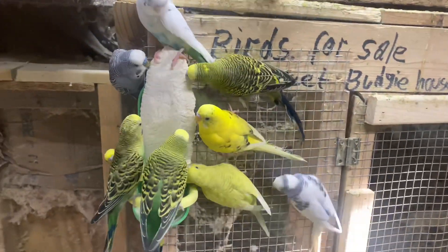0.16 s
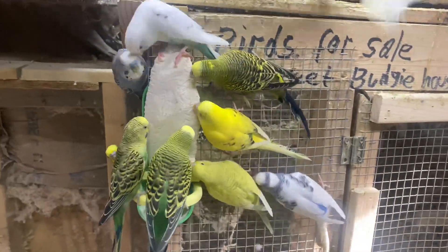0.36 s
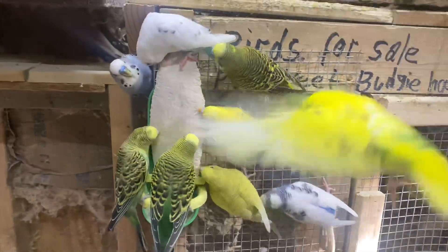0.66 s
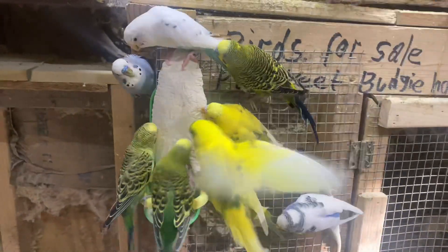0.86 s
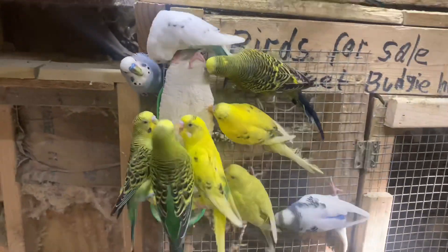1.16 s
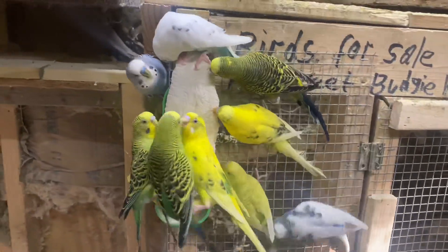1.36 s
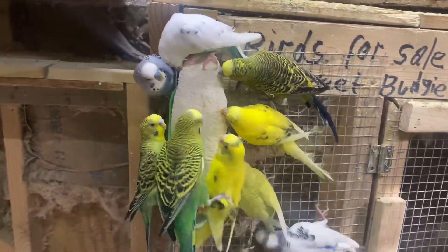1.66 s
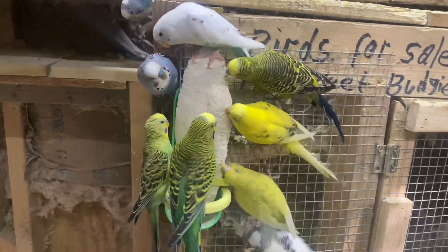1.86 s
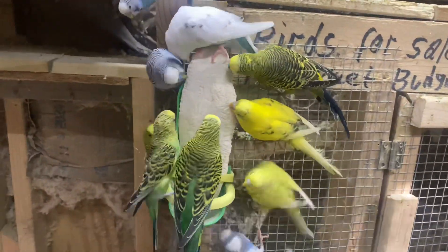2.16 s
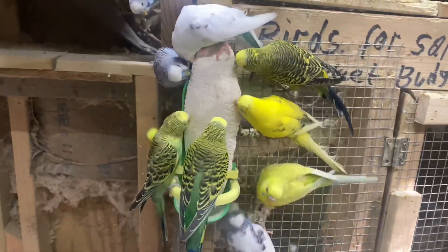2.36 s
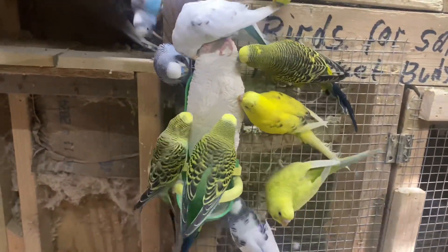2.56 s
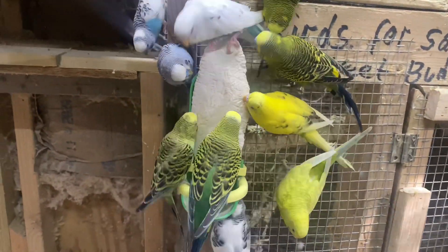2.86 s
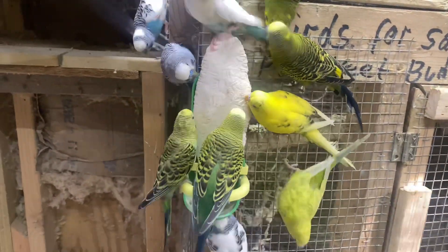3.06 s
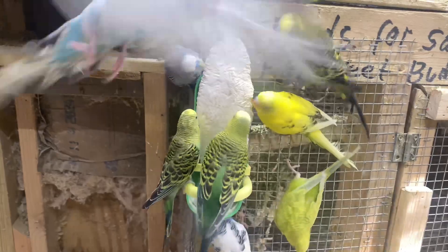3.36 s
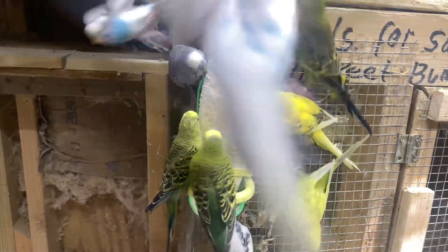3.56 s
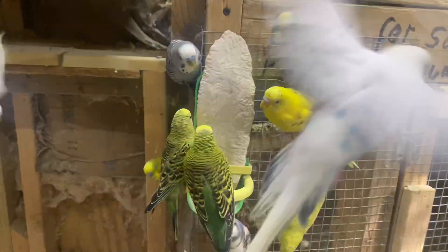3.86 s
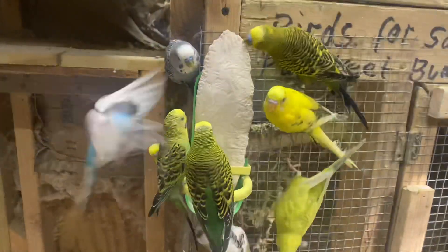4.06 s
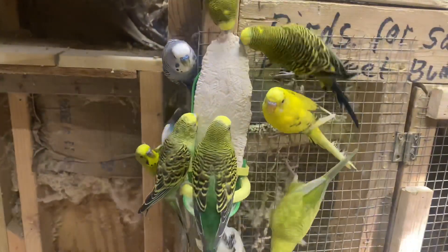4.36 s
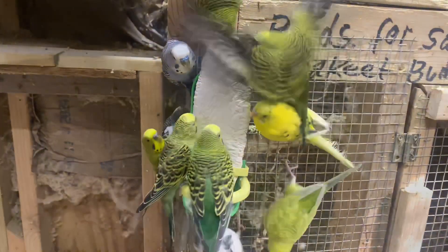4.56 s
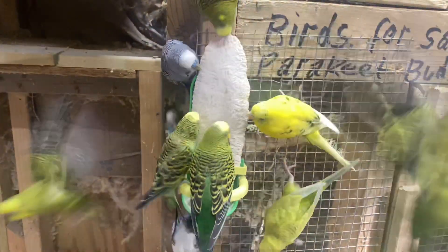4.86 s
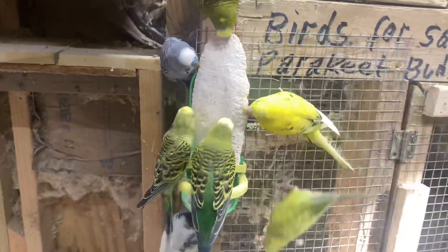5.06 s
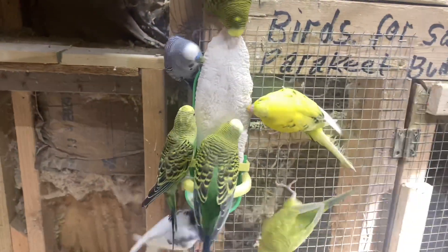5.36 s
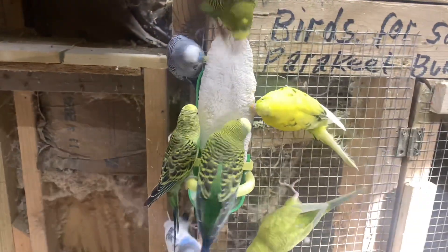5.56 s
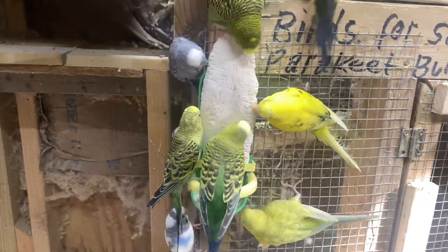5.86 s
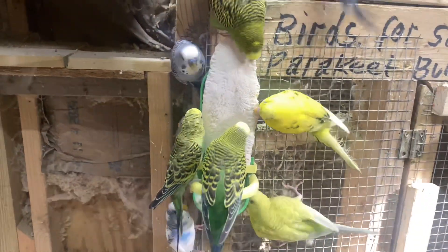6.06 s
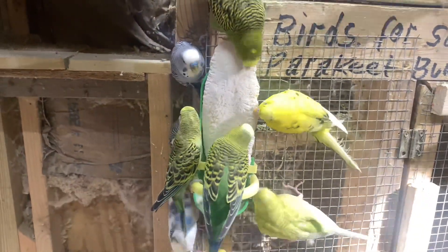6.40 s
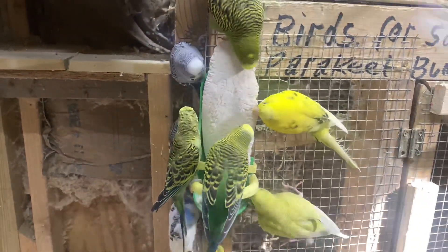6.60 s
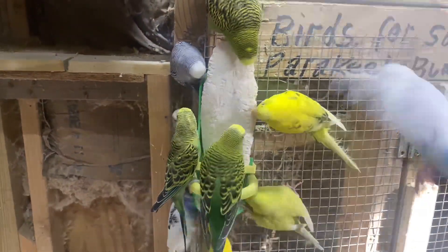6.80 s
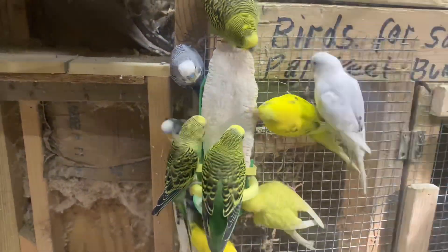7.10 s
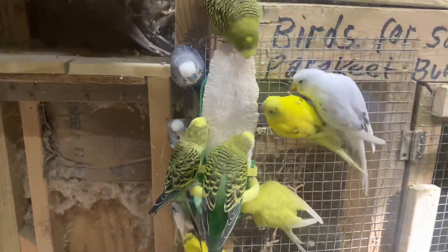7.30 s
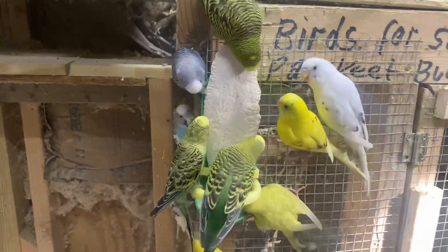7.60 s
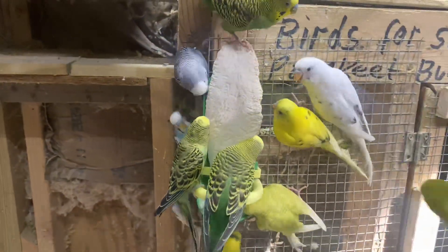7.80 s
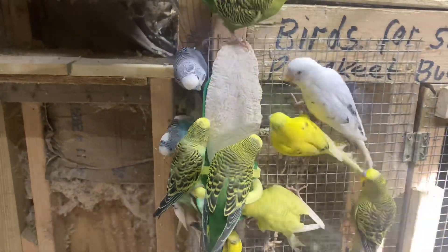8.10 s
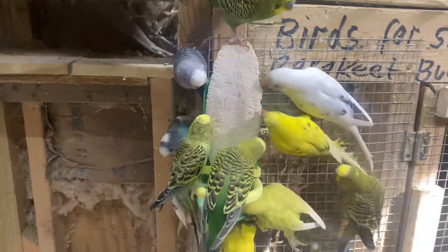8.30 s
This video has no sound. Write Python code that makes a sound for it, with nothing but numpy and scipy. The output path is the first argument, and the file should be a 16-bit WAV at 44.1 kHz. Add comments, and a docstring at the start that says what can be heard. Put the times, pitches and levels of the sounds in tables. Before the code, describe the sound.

Budgerigars chatter throughout in a small wooden aviary with a short echo, over a faint rustle and low rumble. Close birds give buzzy, falling chirps roughly once a second, pausing around the middle. A board knocks dully at the very start. Harsh scolding rasps run through the first 1.8 seconds, and wings swish and whistle from 0.6 to 2 seconds. Bright, quick whistled notes cluster near 3 seconds, followed by more rasps. From 3.4 to 5 seconds, birds fly close, their wingbeats pushing low, soft thumps of air at the microphone, with whistling feathers until 5.2. Another scolding run comes at 6.3, then more air puffs at 6.6 and a brisk flutter from 7 to 7.5. Short whistles, rasps and lighter flapping continue to the end, at about 8.5 seconds. Claws and beaks occasionally tick on wire mesh, clearest at 0.8 and 4.4 seconds.

```python
"""Budgerigars in a small wooden aviary

Close by, the birds chirp, whistle and rasp with the syrinx, a bird's voice box. Some fly past:
their wing feathers whistle and push puffs of air at the microphone. Claws and beaks tick on
the wire mesh, and a board knocks once. Behind it all the rest of the flock chatters,
over a faint rustle and a low rumble."""
import sys
import numpy as np
from scipy import signal
from scipy.fft import rfft, irfft, next_fast_len
from scipy.io import wavfile

SR = 44100
rng = np.random.default_rng(int(sys.argv[2]) if len(sys.argv) > 2 else 0)


def materialize(psi):
    """Save the field psi as 16-bit PCM at rate SR to the path in sys.argv[1].

    A 1-D psi becomes a single channel; in a 2-D psi each row is a channel.
    """
    bounded = np.clip(np.atleast_2d(psi).T, -1, 1)
    quanta = np.round(bounded * 32767).astype(np.int16)
    wavfile.write(sys.argv[1], SR, quanta)


N = 372204

# Each row: start in seconds, length in seconds, level in dB, roughness (0 is clean),
# boost of the chirp's first step in dB.
CHIRP_CALLS = [(0.083, 0.16, -22.5, .5, 1), (0.7, 0.16, -22, .35, 6), (1.434, 0.155, -24, .55, 0),
               (2.236, 0.158, -22.5, .75, 2), (4.505, 0.16, -25, 1, -1), (5.193, 0.157, -23, 1.15, 0),
               (6.014, 0.162, -20.5, .65, -7), (6.807, 0.162, -22, .85, 0), (7.605, 0.16, -24, 1, -1)]
# How one chirp unfolds. Each row: share of its length, pitch in Hz, level change in dB,
# warble depth in Hz at roughness 1.
CHIRP_STEPS = [(0, 3780, -4, 120), (.08, 3670, 2, 100), (.13, 3660, 0, 200), (.16, 3620, -9, 500),
               (.22, 3420, -1, 350), (.32, 3180, 3, 250), (.44, 3120, 1, 300), (.485, 3650, -5, 700),
               (.55, 2600, -7, 400), (.64, 2990, -1, 300), (.77, 2940, 2, 130), (.9, 2990, 2, 160),
               (1, 3020, -4, 300)]


def chirps(pulse_hz=95, pulse_depth=.8):
    """The flock's shared call: three falling steps that break into quick, uneven pulses."""
    out = np.zeros((2, N))
    share, *curves = np.transpose(CHIRP_STEPS)
    for start, length, db, rough, boost_db in CHIRP_CALLS:
        t = clock(length)
        pitch, level_db, warble = [np.interp(t / t[-1], share, curve) for curve in curves]
        call = syrinx(t, pitch, warble * rough, flutter_hz=380, jitter_hz=140 * rough,
                      shimmer_db=2.5, overtone_db=-18.5)
        first_step = np.exp(-(t / length * 6) ** 4)   # 1 at first, then 0
        pulses = np.cumsum(pulse_hz * np.exp(.5 * wander(t, 110))) / SR
        throb = 1 - pulse_depth * (1 - first_step) * np.cos(np.pi * pulses) ** 4
        call = unit_level(call * from_db(level_db + boost_db * first_step) * throb * fade(t, .01, .016))
        add(out, start, placed(call * from_db(db), pan_db=1.6, echo_db=-13, spread_s=.0001))
    return out


# Each row: start in seconds, length in seconds, first and last pitch in Hz, level in dB, roughness.
WHISTLED_NOTES = [(0.453, 0.07, 2290, 2740, -28.5, 0.41), (1.8, 0.074, 1524, 2215, -39, 0.22),
                  (2.555, 0.11, 2410, 3005, -27.5, 0.82), (2.784, 0.041, 3210, 3350, -26.5, 0.79),
                  (2.841, 0.021, 2895, 2824, -16, 0.08), (2.874, 0.036, 3810, 3770, -20, 0.13),
                  (3.018, 0.022, 3010, 2910, -19, 0.053), (3.05, 0.032, 2947, 3057, -18.5, 0.29),
                  (3.214, 0.036, 3280, 3170, -34, 0.42), (3.635, 0.052, 3250, 3480, -39.5, 0.49),
                  (3.669, 0.11, 3750, 3780, -25.5, 0.77), (3.827, 0.11, 3650, 3270, -30, 1.3),
                  (4.544, 0.015, 3250, 3150, -17.5, 0.08), (4.771, 0.081, 3435, 3680, -25, 0.63),
                  (4.868, 0.096, 3334, 3570, -30.5, 0.45), (4.941, 0.043, 6660, 6580, -36.5, 0.36),
                  (4.98, 0.073, 3130, 3350, -27.5, 0.94), (5.247, 0.01, 3140, 3050, -17.5, 0.14),
                  (5.288, 0.061, 3940, 3650, -22.5, 0.36), (5.478, 0.051, 6540, 6500, -35.5, 0.37),
                  (5.5, 0.074, 2246, 2730, -28.5, 0.61), (6.058, 0.043, 3370, 3100, -24.5, 0.08),
                  (6.54, 0.0603, 3634, 3350, -25.5, 0.58), (6.993, 0.053, 2720, 2880, -28, 0.39),
                  (7.568, 0.049, 4400, 3890, -21, 1.73), (7.868, 0.027, 3390, 2570, -26, 1.1),
                  (7.91, 0.078, 2386, 2695, -26.5, 0.85), (8.031, 0.088, 2797, 3154, -25.5, 1.26),
                  (8.382, 0.08, 2610, 2520, -30, 0.94)]


def whistles():
    """Short notes glide from one pitch to another; the rough ones buzz and start more gently."""
    out = np.zeros((2, N))
    for start, length, first_hz, last_hz, db, rough in WHISTLED_NOTES:
        t = clock(length)
        pitch = np.linspace(first_hz, last_hz, len(t))
        call = syrinx(t, pitch, warble_hz=300 * rough, flutter_hz=330, jitter_hz=160 * rough,
                      shimmer_db=3.5 * rough, overtone_db=-24)
        call *= fade(t, in_s=.00092 + .0019 * rough, out_s=.0029)
        add(out, start, placed(call * from_db(db), pan_db=1.2, echo_db=-17, spread_s=.0001))
    return out


def syrinx(t, pitch_hz, warble_hz, flutter_hz, jitter_hz, shimmer_db, overtone_db):
    """A bird's voice: a nearly pure tone that buzzes as its pitch shakes hundreds of times a second."""
    flutter = np.sin(phase_of(flutter_hz * np.exp(.263 * wander(t, 69.2))))
    phase = phase_of(pitch_hz + warble_hz * flutter + jitter_hz * wander(t, 506.4))
    overtones = np.sin(2 * phase) + .22 * np.sin(3 * phase) * (pitch_hz < SR / 6)
    tone = np.sin(phase) + from_db(overtone_db) * overtones
    return unit_level(tone * from_db(shimmer_db * wander(t, 113.8)))


# Runs of scolding. Each row: start in seconds, number of rasps, base length of each in seconds,
# strength of the shrill part in dB, strength of the throaty part in dB.
SCOLDING_RUNS = [(0, 1, 0.067, -30, -33.5), (.172, 1, 0.1, -31.5, -35), (0.424, 1, 0.13, -33, -27.5),
                 (.59, 1, .1, -32.5, -31), (0.81, 1, 0.16, -31, -28.5), (0.95, 5, 0.13, -31.5, -26),
                 (2.445, 1, 0.072, -38.5, -34), (2.924, 1, 0.044, -26, -20.5),
                 (3.102, 1, 0.047, -27.5, -35), (3.32, 4, 0.069, -28.5, -26), (4.08, 1, 0.13, -28, -30.5),
                 (4.295, 1, 0.057, -29, -30), (5.841, 1, 0.12, -36.5, -31), (6.071, 1, 0.02, -36, -26),
                 (6.197, 1, 0.095, -45, -27.5), (6.33, 3, 0.071, -28.5, -25), (7.24, 1, 0.036, -50, -22),
                 (7.567, 1, 0.017, -31, -22.5), (7.718, 1, 0.035, -35.5, -20),
                 (7.788, 1, 0.043, -37.5, -46), (7.955, 1, 0.034, -35.5, -25), (8.238, 1, 0.027, -43, -32)]
# The tone of those two parts. Each row: frequency in Hz, boost in dB.
SHRILL_TONE = [(3000, -27), (4400, -8.5), (5400, 1), (6400, -3), (7300, -1.5), (8300, -8), (9400, -19.5),
               (10900, -4.5), (12200, -15), (13200, -18.5), (15500, -21)]
THROATY_TONE = [(900, -63), (1350, -28.5), (1700, -7), (2200, -11.5), (2700, -4), (3400, 0.5), (4200, 0.5),
                (5200, -2), (7000, -55)]


def rasps(rattle_hz=230, screech_hz=3250, throat_hz=3300, rise=.07):
    """The syrinx snaps unevenly: a shrill screech rises, swells and fades over a throaty rattle."""
    out = np.zeros((2, N))
    for start, length, shrill_db, throaty_db in each_rasp(SCOLDING_RUNS):
        t = clock(length + .0358)
        cycles = np.cumsum(rattle_hz * np.exp(.3 * wander(t, 200))) / SR
        snaps = np.diff(np.floor(cycles), prepend=0) * from_db(2 * wander(t, 322))   # one per cycle
        rattle = from_db(6 * np.cos(2 * np.pi * cycles) + 2.5 * wander(t, 90))
        tuning = np.exp(.035 * rng.standard_normal())   # no two voices are quite alike
        progress = 2 * t / t[-1] - 1   # runs from -1 to 1
        swell = unit_level(from_db(-6 * progress ** 2))
        voice = screech(t, cycles, screech_hz * tuning * (1 + rise * progress / 2))
        shrill = coloured(hiss(t) * rattle, SHRILL_TONE) + unit_level(voice * rattle) * from_db(1)
        shrill *= swell * from_db(shrill_db - 1) * fade(t, .01, .045)
        throaty = coloured(hiss(t) * rattle, THROATY_TONE) * from_db(-4)
        throaty += ring(snaps, throat_hz / tuning, decay_s=.0016) * from_db(-9)
        throaty *= from_db(throaty_db) * fade(t, .0087, .018)
        add(out, start - .008, placed(shrill + throaty, pan_db=.2, echo_db=-12))
    return out


def each_rasp(runs, every_s=.179, drop_db=1.56):
    """A scolding bird keeps an even pace but tires, so each rasp is softer than the last."""
    for start, count, length, shrill_db, throaty_db in runs:
        for k in range(round(count)):
            yield start + k * every_s, length, shrill_db - k * drop_db, throaty_db - k * drop_db


# The strength in dB of the tones at one, two and three times the screech's pitch.
HARMONICS_DB = [-7, 5, -10.5]


def screech(t, cycles, pitch_hz, swing=.03, jitter=.02):
    """A forced voice: the pitch lurches with each snap, and the tone an octave up is loudest."""
    shake = swing * np.sin(2 * np.pi * cycles) + jitter * (wander(t, 1500) + wander(t, 70))
    phase = phase_of(pitch_hz * (1 + shake))
    return sum(from_db(db) * np.sin((k + 1) * phase) for k, db in enumerate(HARMONICS_DB))


# Each row: first and last wingbeat in seconds, number of beats, top pitch in Hz,
# then the strengths in dB of the low tone, its overtones and the swish.
WHISTLING_PASSES = [(0.635, 0.795, 4, 1800, -40, -39, -35), (0.962, 1.347, 7, 1900, -38, -38, -37),
                    (1.408, 1.67, 6, 1900, -39, -40, -38), (1.725, 1.779, 2, 2100, -37, -34, -37),
                    (1.913, 1.913, 1, 2400, -38, -31, -34), (3.19, 3.252, 2, 2500, -44, -32, -39),
                    (3.458, 3.458, 1, 2800, -38, -27, -33), (4.022, 4.022, 1, 2500, -37, -28, -34),
                    (4.293, 4.475, 4, 2600, -33, -26, -33), (4.54, 4.668, 3, 2500, -33, -29, -35),
                    (4.744, 4.967, 4, 2400, -33, -29, -37), (5.045, 5.197, 3, 2400, -32, -28, -37),
                    (5.705, 5.755, 2, 2900, -44, -35, -40), (7.033, 7.458, 8, 2450, -34, -23.5, -35),
                    (7.97, 8.21, 5, 2200, -35, -33, -37)]
# Air rushing through feathers. Each row: frequency in Hz, boost in dB.
SWISH_TONE = [(800, 1), (1700, -38), (3000, -26), (4800, 19), (6000, 14), (11000, 3), (15000, -8)]


def wing_whistles(start_hz=980, stroke_s=.021, skew_s=.0026):
    """Feathers flutter as each wing speeds up: a ragged whistle rises and levels off inside a swish."""
    out, t = np.zeros((2, N)), clock(.028)
    for start, top_hz, low_db, overtone_db, swish_db in each_beat(WHISTLING_PASSES, pitch_columns=1):
        for wing in range(2):
            late, slow, sharp, hard = rng.standard_normal(4)   # the two wings never quite match
            stroke = np.clip(t / stroke_s / np.exp(slow / 7), 0, 1)
            speed = np.sin(1.8 * stroke)
            pitch = (start_hz + (top_hz - start_hz) * speed) * np.exp(.06 * sharp + .055 * wander(t, 650))
            phase = phase_of(pitch)
            flutter = from_db(4.5 * wander(t, 600))
            force = np.sqrt(abs(np.sin(np.pi * stroke))) * flutter
            low = unit_level(np.sin(phase) * force * start_hz / pitch) * from_db(low_db)
            overtones = np.sin(2 * phase) + .27 * np.sin(3 * phase)
            high = unit_level(overtones * force * speed) * from_db(overtone_db)
            swish = coloured(hiss(t) * flutter, SWISH_TONE) * fade(t, .01, .02) * from_db(swish_db)
            beat = (low + high + swish) * from_db(1.6 * hard - 2 - 5 * wing)
            add(out, start - .007 + skew_s * late, placed(beat, pan_db=.2, echo_db=-14))
    return out


# Each row: first and last wingbeat in seconds, number of beats, strength in dB.
FANNING_PASSES = [(0.528, 0.805, 6, -20), (3.394, 3.505, 3, -12.5), (3.553, 4.01, 9, -13.5),
                  (4.145, 4.311, 4, -18.5), (4.578, 4.578, 1, -18), (4.813, 4.96, 4, -14.5),
                  (5.422, 5.484, 2, -19.5), (6.57, 6.885, 7, -15), (7.635, 7.8, 4, -21.5)]
# Rustle and rumble, in the puffs and in the background. Each row: frequency in Hz, boost in dB.
RUSTLE_TONE = [(100, -39), (180, 9), (300, 2.5), (400, 5), (490, 8), (650, -10), (900, -2), (1400, -4),
               (3000, -24)]
RUMBLE_TONE = [(20, -17), (35, -15), (55, -3.5), (75, -3), (110, -13.5), (170, -17.5), (300, -34)]


def wing_puffs(push_hz=58, swell_s=.012, flick_hz=800):
    """Each downstroke starts with a papery flick, then pulls and pushes the air in a low thump."""
    out, t = np.zeros((2, N)), clock(.55)
    swell = (t / swell_s) ** 2 * np.exp(2 - 2 * t / swell_s)
    for start, db in each_beat(FANNING_PASSES):
        pitch = push_hz * np.exp(rng.standard_normal() / 10)
        push = -np.sin(2 * np.pi * pitch * (t - .008)) * swell
        swirls = np.array([coloured(hiss(t), RUMBLE_TONE) for side in out])
        swirls *= np.sqrt(swell) * from_db(-6.5)
        rustle = coloured(hiss(t), RUSTLE_TONE) * np.sqrt(swell) * from_db(-25.5)
        falling_hz = flick_hz * np.exp(-t / .0249 + .25 * wander(t, 600))
        flick = np.sin(phase_of(falling_hz)) * np.exp(-((t - .01) / .005) ** 2) * from_db(-19.5)
        add(out, start - .012, (push + swirls) * from_db(db - 5))
        add(out, start - .026, placed((flick + rustle) * from_db(db), pan_db=-3.5, echo_db=-12))
    return out


def each_beat(flights, pitch_columns=0, passing_db=4):
    """Wings beat evenly, louder as the bird comes near and softer as it leaves."""
    for first_s, last_s, count, *rest in flights:
        count = round(count)
        pitches, levels_db = rest[:pitch_columns], np.array(rest[pitch_columns:])
        for k, start in enumerate(np.linspace(first_s, last_s, count)):
            away = (2 * k + 1) / count - 1   # 0 when the bird is closest
            yield start, *pitches, *(levels_db - passing_db * away ** 2)


# Each row: start in seconds, level in dB.
MESH_TICKS = [(0.778, -23.5), (1.9144, -28), (2.9251, -30), (4.417, -22), (5.7544, -40), (6.3175, -28)]
# The bright tone of a tick. Each row: frequency in Hz, boost in dB.
TICK_TONE = [(1000, -6.5), (4000, -23), (8000, 17), (15500, 9)]


def ticks(decay_s=.0025):
    """Claws and beaks hit the wire mesh with dry little snaps."""
    out, t = np.zeros((2, N)), clock(.03)
    for start, db in MESH_TICKS:
        snap = coloured(hiss(t), TICK_TONE) * np.exp(-t / decay_s)
        add(out, start, placed(snap * from_db(db), pan_db=0, echo_db=-9))
    return out


def knock(start_s=.036, pitch_hz=280, decay_s=.0062):
    """One dull knock on a board: a low tone that dies at once."""
    out, t = np.zeros((2, N)), clock(.1)
    thud = np.sin(2 * np.pi * pitch_hz * t) * np.exp(-t / decay_s)
    add(out, start_s, placed(thud * from_db(-22), pan_db=0, echo_db=-2))
    return out


# The tone of the distant flock. Each row: frequency in Hz, boost in dB.
CHATTER_TONE = [(700, -4.5), (1300, -1), (1700, 3.5), (2100, 1), (2700, 8.5), (3300, 11), (4200, 2),
                (5500, -2), (9000, -55)]


def far_birds(count=500):
    """Birds farther off warble at random: short glides, high and low, blurred by echoes."""
    out = np.zeros((2, N))
    for k, (shift, length, height, glide, db) in enumerate(rng.uniform(-1, 1, (count, 5))):
        t = clock(.018 * np.exp(.5 * length))
        pitch = 2700 * np.exp(.5 * height + .2 * glide * (t / t[-1] - .5))
        call = syrinx(t, pitch, warble_hz=170, flutter_hz=340, jitter_hz=110,
                      shimmer_db=4, overtone_db=-20)
        call *= fade(t, .005, .008) * from_db(db)
        add(out, (k + shift) / count * N / SR, placed(call, pan_db=3 * glide, echo_db=-7))
    return coloured(out, CHATTER_TONE)


# How the distant chatter swells and sinks. Each row: time in seconds, strength in dB.
FLOCK_LOUDNESS = [(0, -28), (.25, -32), (.39, -33.5), (0.552, -32.5), (.9, -28), (1.8, -34), (2.0, -28),
                  (2.13, -37), (2.3, -25.5), (2.43, -32.5), (2.8, -29.5), (3.3, -29.5), (3.62, -35.5),
                  (4.2, -27), (4.4, -33.5), (5.17, -27.5), (5.8, -32.5), (6.46, -34), (7.3, -27),
                  (8.44, -28)]


def flock_swell():
    """The changing loudness of the rest of the flock, as a number to multiply by."""
    return from_db(np.interp(np.arange(N) / SR, *np.transpose(FLOCK_LOUDNESS)))


def murmur(tone, flicker_db, flicker_hz, shared=0):
    """A wash of noise that flickers in level; `shared` is the part common to left and right."""
    noise = rng.standard_normal((3, N))
    stereo = np.sqrt(1 - shared) * noise[:2] + np.sqrt(shared) * noise[2]
    flicker = from_db(flicker_db * wander(np.arange(N) / SR, flicker_hz, count=1024))
    return coloured(stereo, tone) * flicker


def aviary(x, die_away_s=.13, echo_db=-10):
    """The wooden room adds a short echo, duller than the calls."""
    t = clock(.6)
    tail = rng.standard_normal((2, SR))[:, :len(t)]
    tail *= from_db(-60 * t / die_away_s) * np.clip(t / .014, 0, 1)
    tail /= np.sqrt(np.sum(tail ** 2) / 2)
    tail = signal.sosfilt(signal.butter(1, 8000, fs=SR, output="sos"), tail)
    return x + from_db(echo_db) * signal.fftconvolve(x, tail, axes=1)[:, :N]


def placed(x, pan_db, echo_db, spread_s=.0003, echoes=10):
    """Each side hears the sound and its own quick echoes off the boards; positive pan is left."""
    out = np.zeros((2, len(x) + SR // 25))
    for side in out:
        i = int(rng.random() * spread_s * SR)
        side[i:i + len(x)] += x
        for late, sign in zip(rng.random(echoes), rng.choice([-1, 1], echoes)):
            i = int(SR * (.001 + .02 * late))
            side[i:i + len(x)] += x * sign * from_db(echo_db - 1.93 * late)
        side *= np.sqrt(np.sum(x ** 2) / (np.sum(side ** 2) + 1e-20))   # keep the same energy
    return out * from_db([[pan_db / 2], [-pan_db / 2]])


def ring(x, hz, decay_s):
    """Each snap in x sets off a brief ringing tone."""
    t = clock(.004)
    ping = np.sin(2 * np.pi * hz * t) * np.exp(-t / decay_s)
    return unit_level(signal.fftconvolve(x, ping)[:len(x)])


def coloured(x, tone):
    """Shape the lows and highs of a sound by a tone table, then set its level to 1."""
    hz, db = np.transpose(tone)
    size = next_fast_len(x.shape[-1])
    bins = np.maximum(np.fft.rfftfreq(size, 1 / SR), 1)
    gain = from_db(np.interp(np.log(bins), np.log(hz), db))
    gain /= (1 + (bins / hz[-1] / 2) ** 4) * (1 + (hz[0] / bins / 2) ** 4)   # fade past the table's ends
    return unit_level(irfft(rfft(x, size) * gain, size)[..., :x.shape[-1]])


def wander(t, rate, count=256):
    """A random drift, about 1 in size, that turns `rate` times a second."""
    return np.interp(t * rate % (count - 1), np.arange(count), rng.standard_normal(count))


def hiss(t):
    """White noise as long as t."""
    return np.resize(rng.standard_normal(16384), len(t))


def fade(t, in_s, out_s):
    """Round off the start and end of a sound."""
    fade_in = np.sin(np.pi / 2 * np.clip(t / in_s, 0, 1))
    return fade_in * np.sin(np.pi / 2 * np.clip((t[-1] - t) / out_s, 0, 1))


def add(out, start_s, sound):
    """Mix a stereo sound in at its time."""
    i = int(np.clip(start_s * SR, 0, N - 1))
    out[:, i:i + sound.shape[1]] += sound[:, :N - i]


def phase_of(hz):
    return 2 * np.pi * np.cumsum(hz) / SR


def from_db(db):
    return 10 ** (np.asarray(db) / 20)


def unit_level(x):
    return x / np.sqrt(np.mean(x ** 2) + 1e-20)


def clock(length_s):
    return np.arange(max(int(length_s * SR), 64)) / SR


def scene():
    """Birds and wings in the room, over the flock's chatter, a rustle and a low rumble."""
    swell = flock_swell()
    near = chirps() + whistles() + rasps() + wing_whistles() + ticks() + knock()
    room = aviary(near + far_birds() * swell * from_db(-2.8))
    chatter = murmur(CHATTER_TONE, flicker_db=3.5, flicker_hz=27) * swell * from_db(-5.8)
    far_rasps = murmur(SHRILL_TONE, flicker_db=5, flicker_hz=27) * swell * from_db(-12)
    rustle = murmur(RUSTLE_TONE, flicker_db=4, flicker_hz=60, shared=.27) * from_db(-50.5)
    rumble = murmur(RUMBLE_TONE, flicker_db=3.5, flicker_hz=17, shared=.89) * from_db(-44)
    return room + wing_puffs() + chatter + far_rasps + rustle + rumble


def record(dry, lowest_hz=29, highest_hz=15900):
    """Cut away the deepest bass and the highest treble."""
    dry = signal.sosfilt(signal.butter(3, lowest_hz, "high", fs=SR, output="sos"), dry)
    return signal.sosfilt(signal.ellip(10, .3, 80, highest_hz, fs=SR, output="sos"), dry)


dry = scene()
out = record(dry)
materialize(out)
```